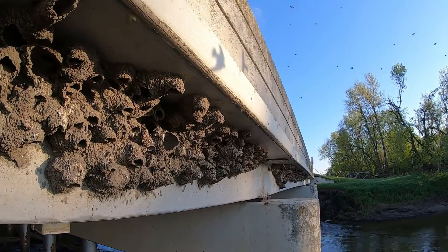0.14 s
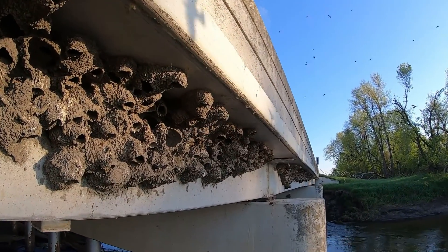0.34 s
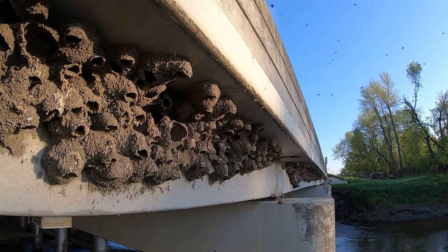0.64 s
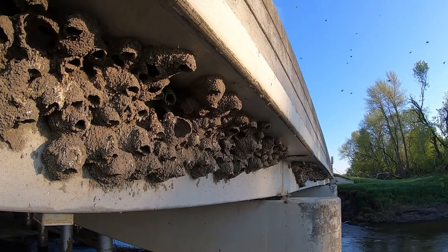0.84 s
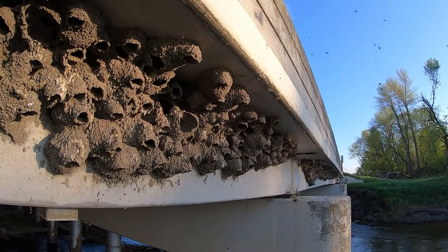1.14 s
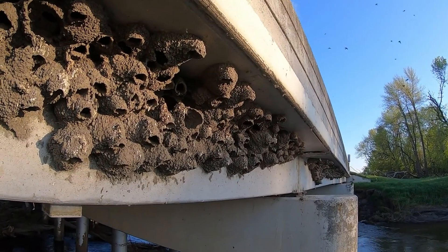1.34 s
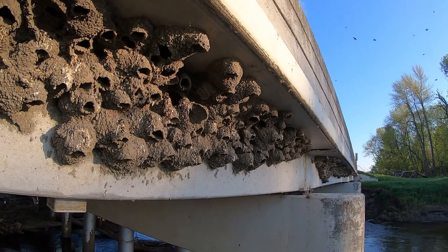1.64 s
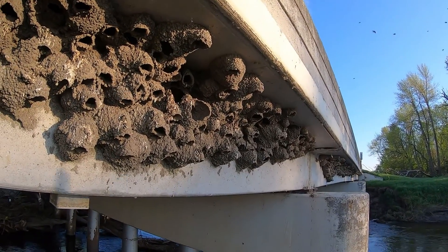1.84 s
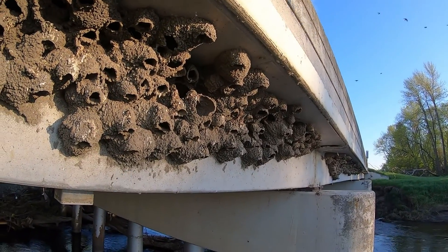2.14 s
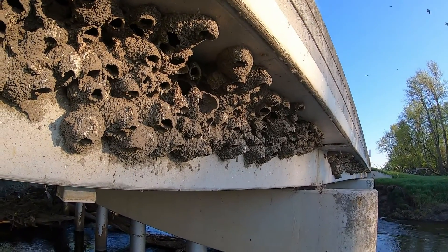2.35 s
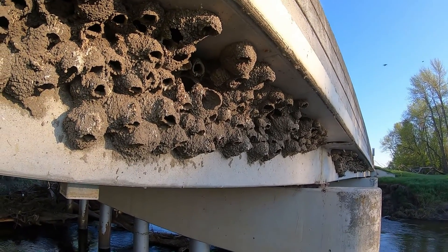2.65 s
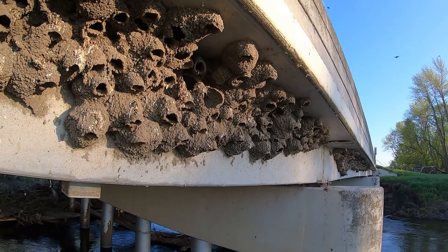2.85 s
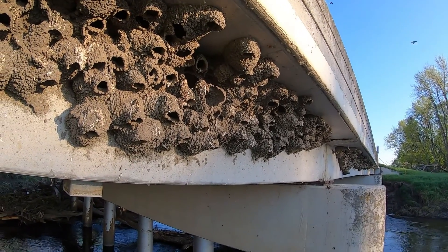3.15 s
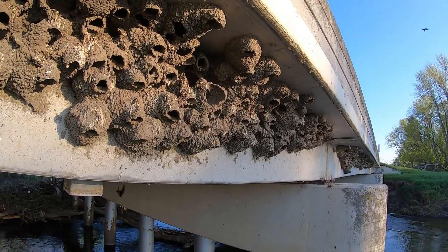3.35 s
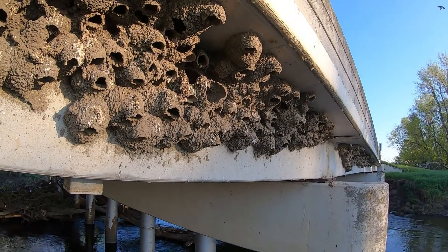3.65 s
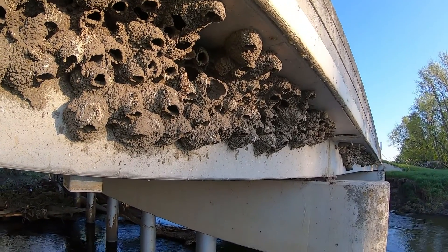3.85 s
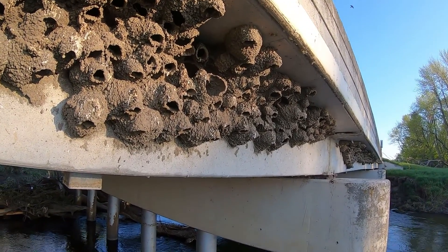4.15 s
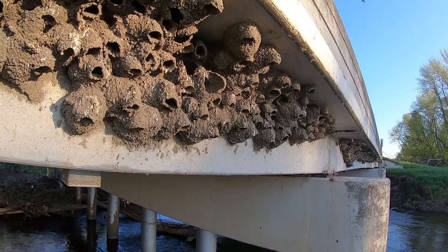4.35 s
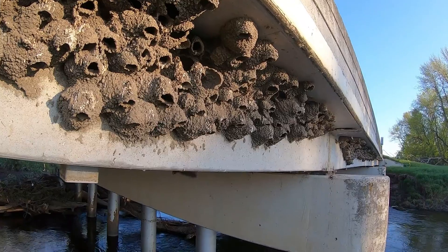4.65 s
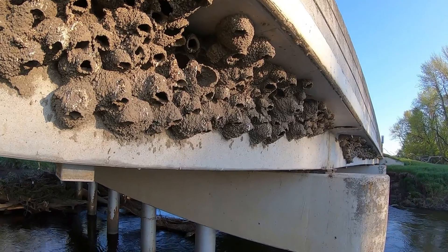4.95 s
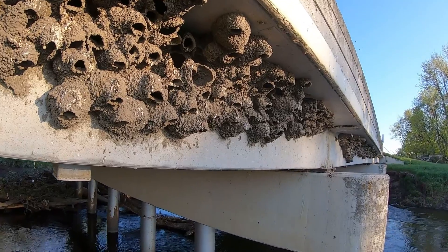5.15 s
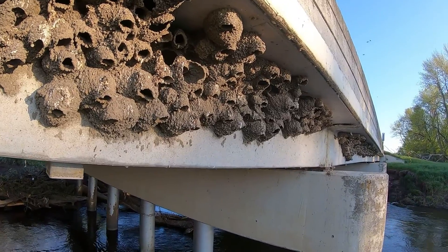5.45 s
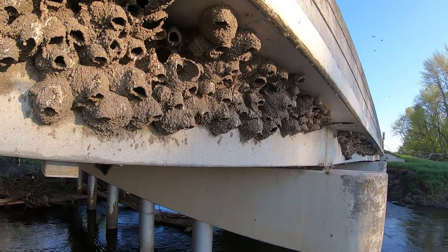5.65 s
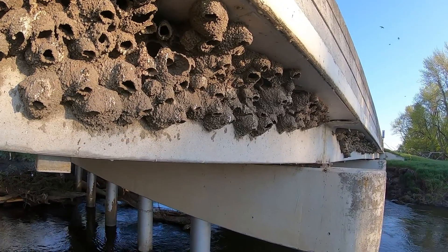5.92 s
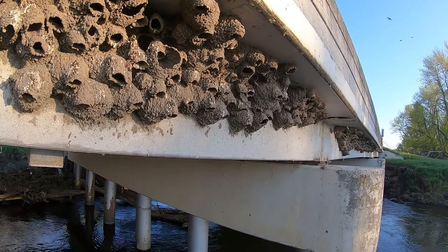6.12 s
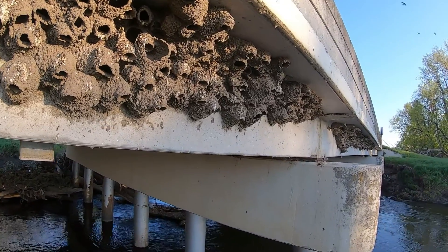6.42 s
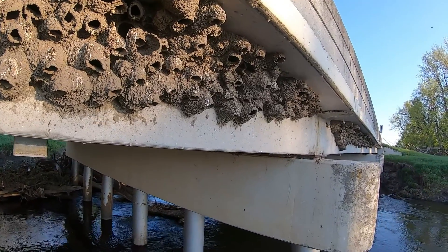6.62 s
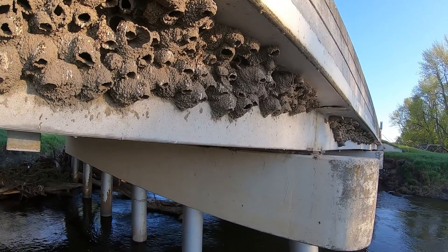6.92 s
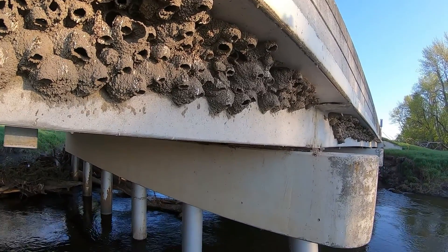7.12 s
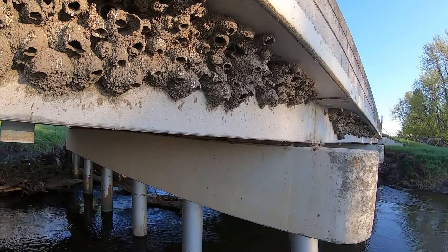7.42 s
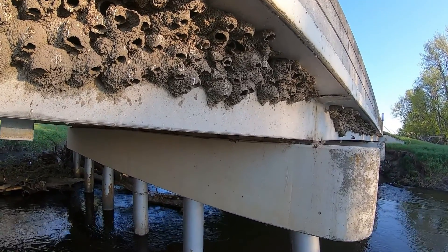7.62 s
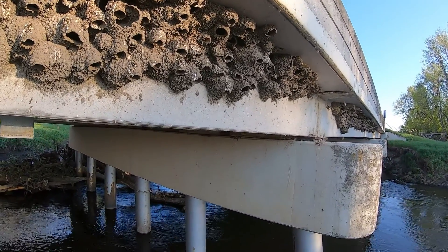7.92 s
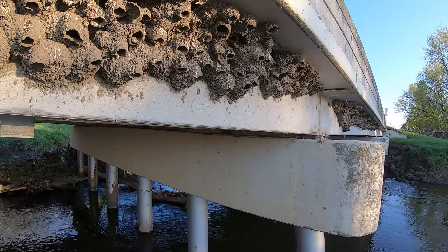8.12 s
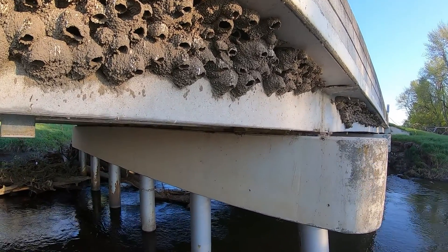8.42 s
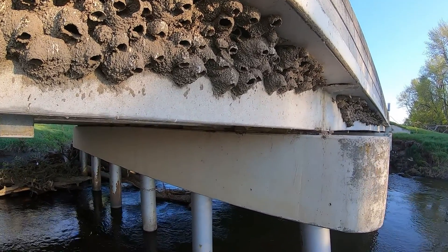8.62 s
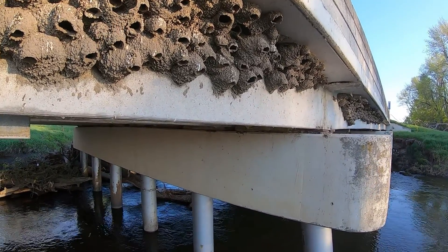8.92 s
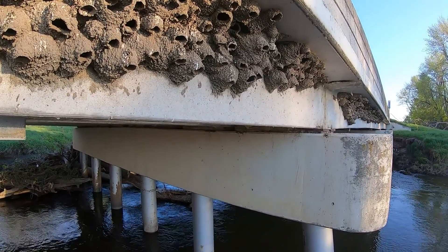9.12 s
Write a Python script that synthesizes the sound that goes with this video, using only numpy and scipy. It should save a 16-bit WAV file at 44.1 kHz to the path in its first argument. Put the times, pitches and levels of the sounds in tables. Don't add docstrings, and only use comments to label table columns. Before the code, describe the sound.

Countless mud-nest birds give rough, sagging, half-speed churrs in a continuous chorus, some passing close, with faint water, wind rumble and sparse bridge echoes.

```python
import sys
import numpy as np
from scipy import signal
from scipy.fft import rfft, irfft, next_fast_len
from scipy.io import wavfile
from scipy.ndimage import uniform_filter1d

SR = 44100
rng = np.random.default_rng(int(sys.argv[2]) if len(sys.argv) > 2 else 0)


def wav_record(signal):
    frames = np.transpose(np.atleast_2d(signal))
    bounded = np.clip(frames, -1, 1)
    quanta = np.round(bounded * 32767).astype(np.int16)
    wavfile.write(sys.argv[1], SR, quanta)


def linear_from_db(decibels):
    return 10 ** (np.asarray(decibels, float) / 20)


N = 408807


def evened(x):
    return x / np.sqrt(np.mean(x ** 2) + 1e-20)


def read(points, hz):
    f, value = np.transpose(points)
    return np.interp(np.log(hz + 1), np.log(f + 1), value)


def curve(rows):
    s, *columns = np.transpose(rows)
    t = np.arange(s[0], s[-1], 1 / SR)
    return [t] + [np.interp(t, s, c) for c in columns]


def coloured(x, gain):
    size = next_fast_len(x.shape[-1])
    spectrum = rfft(x, size) * gain(np.fft.rfftfreq(size, 1 / SR))
    return irfft(spectrum, size)[..., :x.shape[-1]]


def wander(count, size):
    knots = rng.standard_normal(count // size + 2)
    return np.interp(np.arange(count) / size, np.arange(len(knots)), knots)


def add(mix, s, sound, pan_db):
    at = round(s * SR)
    lag = int(np.clip(round(pan_db * 1.1), -7, 7))
    for side, sign in ((0, 1), (1, -1)):
        start = max(at + max(-sign * lag, 0), 0)
        part = mix[side, start:][:len(sound)]
        part += linear_from_db(sign * pan_db / 2) * sound[:len(part)]


# (time [s], low voice [Hz], level [dB])
FLYBYS = [
    [(5.035, 834.7, -38), (5.07, 854, -34), (5.105, 819.5, -30), (5.14, 791, -30), (5.155, 750, -34),
     (5.185, 732, -29.5)],
    [(5.96, 865, -35), (6.0, 830.5, -32.5), (6.05, 790.4, -30.5), (6.09, 745, -32), (6.12, 689, -32.5),
     (6.165, 609, -40)],
    [(6.355, 986, -34), (6.396, 960, -29.5), (6.434, 884.4, -28.5), (6.484, 865, -27), (6.528, 785, -28),
     (6.554, 700, -29.5)],
    [(7.835, 790, -41), (7.858, 895, -30), (7.878, 960, -29), (7.91, 960, -31.5), (7.928, 977, -27),
     (7.96, 931, -26), (8.04, 815, -30.5), (8.09, 730, -32.5), (8.13, 642, -39.5)],
    [(8.325, 854, -34), (8.36, 825, -36.5), (8.395, 749, -35), (8.44, 655, -34), (8.48, 619, -38),
     (8.51, 580, -45)],
    [(3.965, 1109, -38), (3.988, 1074, -30.5), (4.124, 1047, -29.5), (4.142, 1040, -35.5),
     (4.154, 1022, -31.5), (4.196, 995, -30.5), (4.21, 990, -42)],
    [(7.05, 1040, -44), (7.095, 1030, -34.5), (7.14, 1010, -32), (7.175, 1055, -33), (7.196, 1034, -30),
     (7.22, 1030, -35.5), (7.24, 1010, -29), (7.27, 1058, -30.5), (7.32, 1040, -43)],
]
# (slide of high voice [ratio], its share, roughness [0-1], brightness [dB per kHz],
# extra octave of low voice, open-beak ring [dB])
FLYBY_MANNER = [(.01, 2.6, .28, -1.0, -.7, 0), (.03, 1.3, .14, -1.5, -.5, 0), (.03, 0.8, .1, -.8, -0.6, 4),
                (.75, .5, .17, .7, -0.1, 6), (.01, 2.0, .2, -.3, -.3, 0), (.01, .1, .1, .8, 1.0, 4),
                (.01, .4, .34, 1.5, .6, 2)]
FLYBY_PAN_DB = [2, -3.5, 3, -1.5, -1.8, 3.5, -5]
RASP_DB = [-40, -34, -31, -25, -34, -29, -25]


def flybys():
    out = np.zeros((2, N))
    for rows, manner, pan_db, rasp_db in zip(FLYBYS, FLYBY_MANNER, FLYBY_PAN_DB, RASP_DB):
        t, hz, level_db = curve(rows)
        call = churr(hz, *manner) + linear_from_db(rasp_db) * rasp(len(t))
        add(out, t[0], linear_from_db(level_db - 1.5) * call * signal.windows.tukey(len(t), .06), pan_db)
    return out


# (time [s], length [s], low voice at start [Hz], at end [Hz], level [dB])
NEAR = [
    (3.51, 0.2224, 750.4, 688.6, -32.5),
    (5.075, .08, 1225, 1185, -36),
    (8.325, 0.07, 1215, 1150, -35.5),
    (9.22, .08, 1065, 1079, -38.5),
    (3.785, .075, 865, 815, -33),
    (5.225, .06, 1225, 1200, -40),
    (8.055, .12, 820, 730, -35.5),
    (1.54, .19, 1072, 925, -37.5),
    (1.23, .22, 1070, 920, -38),
]
# (share of high voice, roughness [0-1], brightness [dB per kHz],
# extra octave of low voice, pan [dB])
MANNER = [(0.27, .22, -1, -0.22, -3.5), (.1, .14, .8, 1.6, 1.5), (0.27, .14, 0.9, 1.3, 2.5),
          (.5, .3, 2, -0.35, 3), (2.0, .1, -2.5, -.5, 0), (2.2, .1, 1.5, -.3, 1.5), (1.8, .22, 0.2, -.2, 1),
          (1.6, .22, 1.5, -.5, 1.5), (1.3, .24, 2, -.5, 1.5)]


def close_calls():
    out = np.zeros((2, N))
    for (s, length, start_hz, end_hz, level_db), (*manner, pan_db) in zip(NEAR, MANNER):
        roughness = manner[1]
        hz, shape = fall(length, start_hz, end_hz, rise=.06 + .78 * roughness)
        add(out, s, linear_from_db(level_db - 2.5) * shape * churr(hz, 0.05044, *manner), pan_db)
    return out


# (time [s], length [s], low voice at start [Hz], at end [Hz],
# level [dB])
MIDDLE = [(0, .13, 846, 813, -38), (.75, .3, 861, 639, -37), (.966, 0.25, 958, 875, -45.5),
          (1.605, .33, 1013, 674, -43.5), (1.878, .19, 1149, 960, -39), (2.985, .19, 964, 872, -39.5),
          (3.145, .33, 1067, 1005, -46), (3.541, .33, 793, 694, -43.5), (4.087, .33, 1028, 907, -43),
          (4.377, .21, 1015, 787.9, -38.5), (4.6, .27, 1058, 911, -41), (4.987, .33, 1058, 960, -47),
          (6.162, .33, 1035, 847.6, -43.5), (7.335, .3, 743, 719.5, -47),
          (.38, .14, 864, 687, -43), (.8, .28, 919, 634.4, -38.5), (1.75, .16, 850, 683, -44),
           (1.97, .2, 918, 767, -43), (2.12, .15, 758, 659, -38.5), (2.57, .2, 885, 781, -39),
           (3.16, .24, 1180, 956, -44), (3.17, .14, 858, 807, -43.5), (4.46, .31, 885.3, 497, -37),
           (5.055, .1, 995, 952, -38), (5.45, .07, 755, 968, -41), (6.051, .15, 977.5, 802, -39.5),
           (8.14, .16, 1199, 1050, -41.5), (8.7, .15, 899, 791, -43.5), (8.84, .18, 959.7, 836, -42)]
# (time [s], length [s], start [Hz], end [Hz], level [dB])
LEFT = [
    (.33, .29, 1000, 816, -49),
    (.541, .19, 976.3, 828, -39),
    (3.783, .12, 885, 809, -42.5),
    (8.067, .19, 692.7, 622, -47.5),
    (8.687, .31, 1161, 1030, -45),
]
# (time [s], length [s], start [Hz], end [Hz], level [dB])
RIGHT = [
    (1.024, .27, 960.3, 669, -38),
    (2.04, .23, 901, 882, -43),
    (2.556, .15, 698.8, 525.9, -40),
    (2.633, .2, 881, 760, -39),
    (3.156, .23, 786, 619, -43),
    (6.544, .27, 669.3, 547.3, -38),
    (6.612, .33, 946.4, 832.7, -42.5),
    (6.827, .31, 1090, 925, -53),
    (8.862, .34, 1184, 828.6, -47.5),
]


def middle_calls():
    out = np.zeros((2, N))
    for rows, pan_db in ((MIDDLE, 0.56), (LEFT, 7.5), (RIGHT, -6.5)):
        for s, length, start_hz, end_hz, level_db in rows:
            hz, shape = fall(length, start_hz, end_hz)
            voice = churr(hz, slide=0.1003, share=0.79, rough=.17)
            add(out, s, linear_from_db(level_db - 1.0) * shape * voice, pan_db)
    return out


def fall(length, start_hz, end_hz, rise=0.32):
    u = np.linspace(0, 1, round(length * SR))
    shape = np.clip(u / rise, 0, 1) * np.clip((1 - u) / 0.074, 0, 1)
    return start_hz * (end_hz / start_hz) ** (u ** 1.1), shape


def train(phase, sharp):
    sharp = np.clip(sharp, .2, .9)
    return (1 - sharp ** 2) / (1 - 2 * sharp * np.cos(phase) + sharp ** 2)


# (frequency [Hz], level [dB])
THROAT = [(260, -30.5), (450, -28), (594, -19), (938, -10.5), (1210, -5.5), (1610, 0), (2080, -3),
          (2610, -10), (3360, -19), (4430, -25.5), (5060, -25), (5780, -38), (6920, -45), (8000, -67),
          (10400, -93.5), (17600, -120)]


def churr(hz, slide, share, rough, bright_db=0., octave=0., ring_db=0.):
    count = len(hz)
    t = np.arange(count) / SR
    hz = hz * (1 + 0.0499 * rough * wander(count, size=900))
    hz = hz * (1 + (.004 + .03 * rough) * wander(count, size=90))
    low_hz = hz * (1 + 0.05985 * rough * wander(count, size=90))
    high_hz = hz * (2.5 + slide * np.clip(1 - t / .12, 0, 1) ** 2)
    low = 2 * np.pi * np.cumsum(low_hz) / SR
    high = 2 * np.pi * np.cumsum(high_hz) / SR
    pulses = train(low, .74 - 0.7 * t)
    voice = (pulses - 1) + octave * np.cos(2 * low)
    voice += 1.797 * share * (train(low, 0.6) + 0.15) * np.cos(high + 2 * np.pi * rng.random())
    voice *= 1 + 1.708 * rough * wander(count, size=40)
    voice += 2.0 * rough * pulses * rng.standard_normal(count)

    def throat(f):
        ring = ring_db * np.exp(-((f - 3230) / 800) ** 2)
        gain_db = read(THROAT, f) + (2.0 + bright_db) * f / 1000 + ring
        smear_s_per_khz = .0006
        return linear_from_db(gain_db) * np.exp(-1j * np.pi * smear_s_per_khz * f ** 2 / 1000)

    return evened(coloured(voice, throat))


def rasp(count):
    grain = rng.standard_normal(count) * linear_from_db(3.0 * wander(count, size=200))
    return evened(coloured(grain, lambda f: linear_from_db(read(THROAT, f) + 3 * f / 1000) / (1 + (3600 / (f + 1)) ** 6)))


# (time [s], start [Hz], end [Hz], level [dB])
STRANDS = [(0.0, 2131.0, 2074, -39.0), (0.02, 1270.0, 1212, -43.0), (0.025, 1851.0, 1523, -39),
           (0.554, 925.0, 868, -51.0), (0.993, 925.0, 870.0, -48.0), (1.078, 861.0, 751.0, -49.5),
           (1.277, 2691.0, 2416.0, -46), (1.36, 1900.0, 1560.0, -39.5), (1.546, 2648.0, 2593.0, -42.0),
           (1.601, 968.0, 913.0, -49.0), (1.62, 2620.0, 2250.0, -43.0), (1.836, 1055.0, 1055.0, -46.0),
           (1.851, 1873.0, 1543.0, -40), (2.13, 1701.0, 1650, -37.5), (2.53, 3780.0, 3700.0, -54.5),
           (2.569, 1571.0, 1461.0, -38.5), (3.163, 2906.0, 2845, -50.0), (3.178, 1055.0, 999, -45.5),
           (3.178, 2110.0, 2055.0, -39.0), (3.183, 1873.0, 1763.0, -36.0), (3.307, 968.0, 855, -49.5),
           (3.547, 796.0, 740, -46), (4.046, 1614.0, 1450, -40.0), (4.305, 904.0, 904.0, -48.0),
           (4.46, 1421.0, 1148, -43.5), (4.46, 2505, 2150, -43.5), (4.714, 2433.0, 2378.0, -43.5),
           (4.8, 2790, 2590, -48), (4.979, 1679.0, 1459.0, -42.0), (4.999, 2088.0, 2088.0, -43.0),
           (5.068, 1205.0, 1196, -47), (5.135, 3126, 2395, -43.5), (5.59, 1400, 1300, -42.5),
           (5.7, 2100, 1950, -40.5), (5.77, 3450, 3250, -57), (5.78, 1750, 1550, -39.5),
           (6.066, 1141.0, 978, -44.0), (6.106, 1722.0, 1392.0, -40), (6.41, 2723, 2455, -41.5),
           (6.78, 1808.0, 1478.0, -42.5), (6.879, 1550.0, 1495.0, -42), (8.141, 3014.0, 2849.0, -51.0),
           (8.146, 2670.0, 2450.0, -45), (8.16, 1830.0, 1550.0, -41), (8.436, 2583.0, 2198.0, -44.5),
           (8.5, 2400.0, 1995, -43), (8.71, 2340, 2190, -42), (8.88, 2300, 1976, -41),
           (9.054, 925.0, 813, -50.5), (9.054, 2433.0, 1993.0, -42)]
# (time [s], length [s], frequency [Hz], level [dB])
SCRAPES = [
    (7.088, .03, 4300, -56),
    (7.15, .03, 4150, -57),
    (7.186, .04, 4150, -48),
    (7.195, .035, 5150, -57),
    (7.252, .028, 4350, -48),
    (7.262, .035, 4050, -52),
    (7.265, .03, 5000, -55),
]


def strands():
    out = np.zeros((2, N))
    waver = .007
    rows = [(s, .115, start_hz, end_hz, db - 1.5, waver) for s, start_hz, end_hz, db in STRANDS]
    rows += [(s, length, hz, .98 * hz, db, 5 * waver) for s, length, hz, db in SCRAPES]
    for s, length, start_hz, end_hz, level_db, sway in rows:
        hz = np.linspace(start_hz, end_hz, round(length * SR))
        hz = hz * (1 + sway * wander(len(hz), size=150))
        tone = np.sin(2 * np.pi * np.cumsum(hz) / SR)
        tone *= (1 + .4 * wander(len(hz), size=350)) * signal.windows.tukey(len(hz), .4)
        add(out, s, linear_from_db(level_db) * evened(tone), rng.uniform(-2.2, 2))
    return out


# (time [s], pitch [Hz], level [dB])
COO = [
    (0.15, 313, -59),
    (0.2, 351.1, -62.5),
    (0.302, 338.9, -72),
    (0.322, 407.4, -65.5),
    (0.472, 339.6, -62.5),
    (0.516, 373.9, -67.5),
    (0.552, 305, -56),
    (0.85, 343, -71),
]
# (time [s], pitch [Hz], level [dB])
WHISTLE = [
    (.55, 3350, -56),
    (.575, 3370, -51),
    (.61, 3320, -52),
    (.625, 3280, -60),
]


def coo_and_whistle():
    out = np.zeros((2, N))
    for rows, lift_db, sway in ((COO, 3., .033), (WHISTLE, -1., .008)):
        t, hz, level_db = curve(rows)
        tone = np.sin(2 * np.pi * np.cumsum(hz * (1 + sway * wander(len(t), size=300))) / SR)
        tone *= 1 + .5 * wander(len(t), size=500)
        add(out, t[0], linear_from_db(level_db + lift_db) * tone * signal.windows.tukey(len(t), .3), .1)
    return out


# (time [s], peak [dB], centre [Hz], half-width [Hz])
TICKS = [
    (.424, -32.5, 4800, 2000),
    (.670, -28, 4400, 1300),
    (.678, -33, 4000, 900),
    (5.885, -21.5, 1600, 500),
    (.238, -44, 5000, 1500),
    (.724, -43, 4600, 1200),
    (2.059, -43, 4800, 1500),
    (5.058, -43, 5800, 1400),
    (6.738, -44, 4800, 1500),
]


def bill_ticks():
    out = np.zeros((2, N))
    t = np.arange(900) / SR
    envelope = linear_from_db(-60 * abs(t - .002) / np.where(t < .002, .002, .022))
    for s, peak_db, hz, width in TICKS:
        burst = rng.standard_normal(len(t)) * envelope
        snap = coloured(burst, lambda f: 1 / (1 + ((f - hz) / width) ** 4))
        add(out, s - .002, linear_from_db(peak_db) * snap / abs(snap).max(), .1)
    return out


# (time [s], level [dB], pan [dB])
CHORUS = [(0, -31, 1), (.25, -36, 1), (1.0, -34.5, 1.5), (1.7, -31.5, 2), (2.1, -33, 1), (2.79, -30.5, -1),
          (3.4, -31.5, -2), (4.03, -32, -2.5), (4.65, -32.5, -1.5), (5.6, -34, -1.5), (6.2, -32.5, -3),
          (6.4, -32.5, 4), (6.66, -35.5, 2), (6.97, -35, -2.5), (7.6, -34.5, -1.5), (8.03, -32.5, 1),
          (8.9, -33, 0.5), (9.27, -37, 0.5)]
# (time [s], depth [dB], half-width [s])
LULLS = [(.58, 3.5, .1), (.73, 0, 0.033), (1.0, 2.5, 0.14), (1.5, 2.5, .06), (1.729, 3.5, 0.037),
         (2.05, 2, .08), (2.27, 1, .1), (2.49, 4, 0.064), (2.78, 1.5, .07), (2.94, 3, 0.076),
         (3.1, 4.5, 0.065), (3.42, 1.5, .04), (3.76, 5, 0.1), (3.92, 2.5, 0.054), (4.05, 2, .1),
         (4.42, 5, 0.15), (5.0, 6, .16), (5.5, 4, 0.12), (5.9, 3.5, .06), (6.43, 2.5, .12), (6.57, 3, .05),
         (7.95, 1, .08), (7.8, 4.5, 0.143), (8.3, 5, 0.1), (8.48, 3, 0.073), (8.67, 4.5, .13),
         (9.02, 1, 0.1)]


def chorus():
    out = np.zeros((2, N + SR))
    calls, lead_s = 280, .4
    for k, (when, length, pitch, drop, slide, share, loud, pan) in enumerate(rng.random((calls, 8))):
        start_hz = 735 + 480 * pitch
        hz, shape = fall(.12 + .16 * length, start_hz, start_hz * (.95 - .3 * drop))
        s = (k + when) / calls * (N / SR + lead_s)
        voice = churr(hz, .5 * slide, 1.548 * share, rough=.33)
        add(out, s, linear_from_db(5.0 * loud) * shape * voice, 8. * (pan - .5))
    out = out[:, round(lead_s * SR):][:, :N]
    swell = np.sqrt(uniform_filter1d((out ** 2).mean(0), 5000))
    s, level_db, pan_db = np.transpose(CHORUS)
    t = np.arange(N) / SR
    slow = t[::64]
    lull_db = sum(db * np.exp(-((slow - at) / width) ** 2) for at, db, width in LULLS)
    effort_db = np.array([np.interp(t, s, level_db + side * pan_db) for side in (.5, -.5)])
    gain_db = effort_db - np.interp(t, slow, lull_db)
    return out / swell * linear_from_db(0.3284 + gain_db)


def bridge(x):
    count, t60 = SR // 2, 0.52
    taps = rng.choice([-1., 1.], (2, count)) * (rng.random((2, count)) < 2000 / SR)
    taps[:, :300] = 0
    taps *= linear_from_db(-60 * np.arange(count) / SR / t60)
    return signal.fftconvolve(x, taps / np.linalg.norm(taps[0]), axes=1)[:, :N]


def pair(same):
    a, b = rng.standard_normal((2, N))
    same = np.clip(same, 0, 1)
    return np.array([a, same * a + np.sqrt(1 - same ** 2) * b])


# (frequency [Hz], level [dB per Hz])
HUSH = [(35, -51), (60, -30), (237, -25.5), (494, -22.5), (877, -17), (1790, -4), (2160, -11.5),
        (3530, -23.5), (5100, -37), (6930, -44), (8000, -75.5), (10400, -103), (17600, -120)]


def river_hush():
    swell_db = 1.1 * wander(N, size=6000)
    return evened(coloured(pair(0.36), lambda f: linear_from_db(read(HUSH, f)))) * linear_from_db(-42 + swell_db)


# (time [s], peak [dB], time to rise or fall by 10 dB [s])
GUSTS = [(0, -66, 0.06), (.5, -62.5, 0.4), (1.65, -64.5, 0.1), (1.88, -65.5, 0.14), (2.17, -50.5, 0.1048),
         (2.32, -51, 0.12), (2.45, -47, 0.0945), (2.72, -55.5, 0.1), (2.93, -60, 0.14), (3.2, -60.5, 0.19),
         (3.38, -56, 0.05), (4.2, -65, 0.4), (4.75, -64, 0.3), (5.47, -56, 0.0743), (5.9, -59.5, 0.23),
         (6.1, -63, 0.04), (6.401, -54.5, .12), (6.85, -62, 0.16), (7.33, -55.5, 0.1352), (7.68, -52, 0.2),
         (7.93, -53.5, 0.3), (8.15, -58.5, 0.2), (8.31, -58, 0.05), (8.45, -58, 0.12), (8.88, -60.5, 0.06)]


def wind():
    rumble = evened(coloured(pair(0.82), lambda f: f / (f + 15) / (1 + (f / 50) ** 1.7)))
    t = np.arange(N) / SR
    slow = t[::64]
    gusts = linear_from_db(-74.5) + sum(linear_from_db(db - 10 * abs(slow - s) / fall_s) for s, db, fall_s in GUSTS)
    return rumble * np.interp(t, slow, gusts) * linear_from_db(-4.0 + 4.0 * wander(N, size=1300))


def deck_hum():
    hum = evened(coloured(pair(0.33), lambda f: 1 / (1 + ((f - 80) / 12) ** 2)))
    return linear_from_db(-68.5) * hum * linear_from_db(3.5 * wander(N, size=4000))


# (time [s], peak [dB], centre [Hz])
GURGLES = [(0, -63, 304), (.59, -47.5, 311), (1.16, -57, 336), (1.57, -50.5, 328.1), (2.27, -54.5, 289.6),
           (2.76, -55, 360), (3.0, -61.5, 262.8), (3.9, -60, 421), (4.31, -61.5, 319.1), (5.27, -57, 377),
           (5.7, -60, 214), (5.85, -59, 308.6), (6.4, -51.5, 293), (6.97, -56, 220.1), (7.77, -55.5, 288),
           (8.47, -58, 383), (8.72, -53.5, 185.3), (8.98, -49, 388.5)]


def gurgles():
    slosh = evened(coloured(pair(0.38), lambda f: 1 / (1 + (f / 35) ** 2)))
    bubbles = np.zeros((2, N + SR))
    u = np.arange(-SR // 2, SR // 2) / SR
    for s, db, hz in GURGLES:
        envelope = linear_from_db(db - 4.5 - 52.5 * abs(u))
        add(bubbles, s, envelope * np.cos(2 * np.pi * hz * u), 0)
    return slosh * bubbles[:, SR // 2:][:, :N]


def scene():
    far = chorus()
    bed = river_hush() + wind() + deck_hum() + gurgles()
    near = flybys() + close_calls() + middle_calls() + coo_and_whistle() + bill_ticks() + strands()
    wet = bridge(linear_from_db(-11.5) * near + linear_from_db(-5.5) * far)
    return near + linear_from_db(-1.6) * far + wet + bed


def roll_off(x):
    return signal.sosfilt(signal.butter(12, 8150, fs=SR, output="sos"), x)


# (frequency [Hz], lead of the left port [radians])
PORTS = [(0, 0), (1980, 0.2), (2670, 0.4), (4310, 2.3), (7750, 3.9)]
# (frequency [Hz], level [dB])
WIDTH = [(60, -0.3), (300, -2), (700, 4), (1500, -2), (3000, -0.5), (6000, 0)]


def record(dry):
    right = coloured(dry[1], lambda f: np.exp(-1j * read(PORTS, f)))
    side = coloured(dry[0] - right, lambda f: linear_from_db(read(WIDTH, f)))
    mix = (dry[0] + right + np.array([side, -side])) / 2
    return roll_off(mix)


dry = scene()
out = record(dry)
wav_record(out)
```